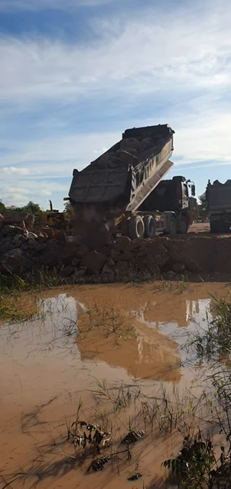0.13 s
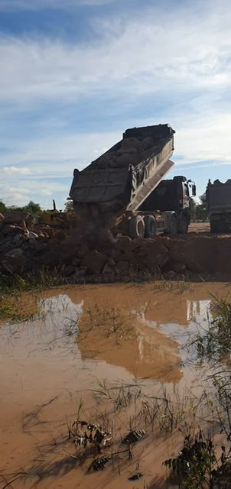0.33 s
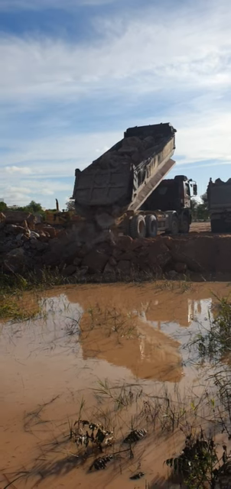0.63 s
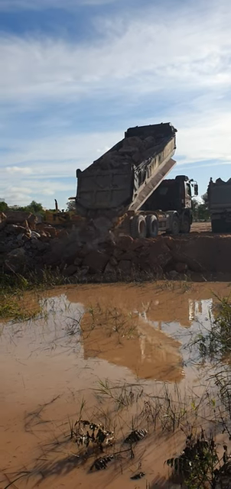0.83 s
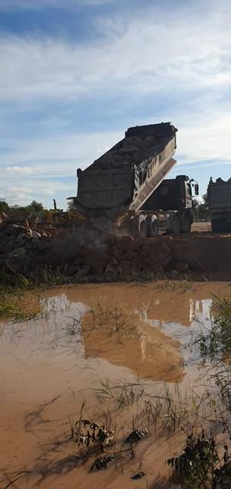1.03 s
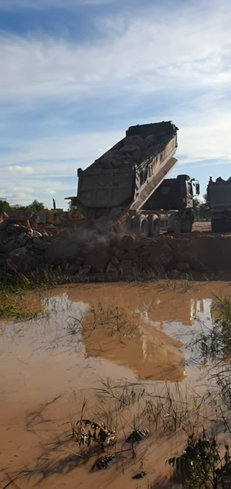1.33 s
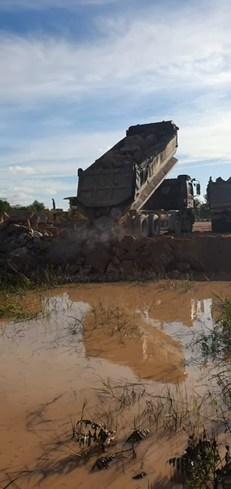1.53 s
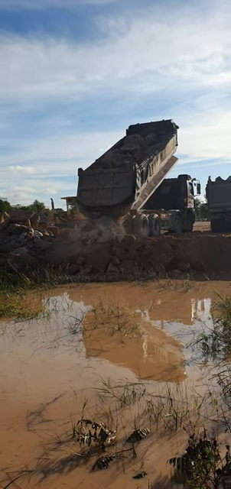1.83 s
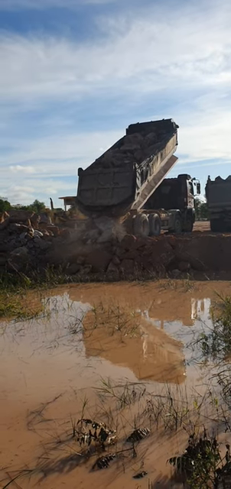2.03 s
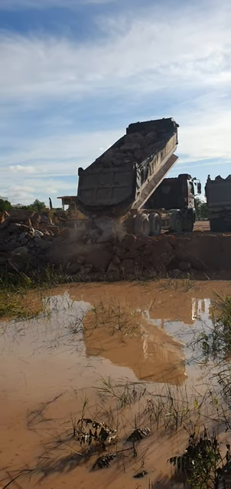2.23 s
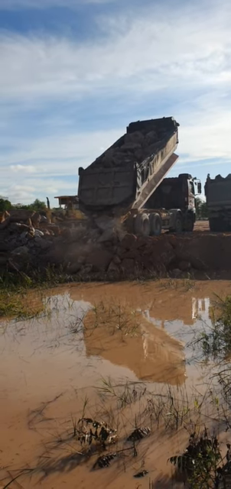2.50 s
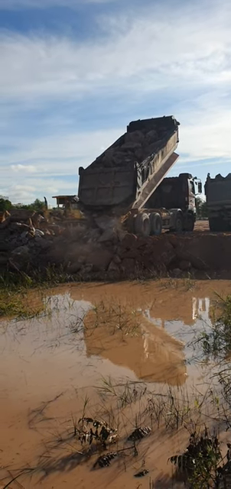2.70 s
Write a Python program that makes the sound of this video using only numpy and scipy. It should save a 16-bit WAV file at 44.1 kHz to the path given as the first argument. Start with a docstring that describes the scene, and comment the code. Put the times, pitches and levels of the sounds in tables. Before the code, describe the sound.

Rocks and soil tumble from a dump truck bed with booming thuds over a diesel drone

```python
"""A load of stone and soil rumbles and rattles from the raised steel bed of a dump truck across a pond.
The pour is shaped noise over a shower of small contacts; big rocks are contact bursts with short tones.
Decaying sines make ground booms and bed clangs, wavering tones make squeals, and filtered noise makes chips.
A diesel drones on lines tied to its firing rate, over a noise roar. The pour thins out.
A small stereo microphone hears it from afar."""
import sys
import numpy as np
from scipy import signal
from scipy.fft import rfft, irfft, next_fast_len
from scipy.io import wavfile
from scipy.ndimage import uniform_filter1d, minimum_filter1d, map_coordinates

SR = 44100
rng = np.random.default_rng(int(sys.argv[2]) if len(sys.argv) > 2 else 0)


def output_pcm(signal):
    """Save a mono or channel-first signal as 16-bit PCM at the path in sys.argv[1].

    Samples are clipped to [-1, 1] before scaling.
    """
    pcm = np.clip(np.atleast_2d(signal).T, -1, 1) * 32767
    wavfile.write(sys.argv[1], SR, np.round(pcm).astype(np.int16))


N = 126126


def amp(db):
    """Decibels to gain."""
    return 10 ** (np.asarray(db) / 20)


def unit(x):
    """Scale to rms 1."""
    return x / np.sqrt(np.mean(x ** 2) + 1e-20)


def along(points, hz):
    """Read (frequency, value) points on a log frequency axis."""
    f, v = np.transpose(points)
    return np.interp(np.log(hz + 1), np.log(f + 1), v)


def since(s):
    """Seconds since s, zero before it."""
    return np.maximum(np.arange(N) / SR - s, 0)


def curves(rows):
    """One value per sample for each column after the time."""
    s, *columns = np.transpose(rows)
    return [np.interp(since(0), s, column) for column in columns]


def wobble(rate):
    """A smooth random curve, rate knots a second."""
    knots = rng.standard_normal(8192)
    return map_coordinates(knots, [since(0) * rate], mode="wrap")


def wander(size, width_hz, smooth):
    """A randomly walking phase that blurs a tone, averaged over smooth samples."""
    drift = np.cumsum(rng.standard_normal(size)) * np.sqrt(2 * np.pi * abs(width_hz) / SR)
    return uniform_filter1d(drift, smooth)


def tone(hz, width_hz):
    """A sine of rms 1, blurred by a wandering phase."""
    return np.sqrt(2) * np.sin(2 * np.pi * hz * since(0) + wander(N, width_hz, SR // 700))


def blow(s, rise_s, t60):
    """A quick rise and an exponential decay of 60 dB in t60 seconds."""
    t = since(s)
    return (1 - np.exp(-t / rise_s)) * amp(-60 * t / t60)


def filtered(x, response):
    """Apply a complex response of frequency."""
    m = next_fast_len(N + SR // 2)
    return irfft(rfft(x, m) * response(np.fft.rfftfreq(m, 1 / SR)), m)[..., :N]


def band_noise(pitch_hz, octaves):
    """Stereo noise of rms 1 in a bell-shaped band around one pitch."""
    def bell(hz):
        return np.exp(-.5 * (np.log2((hz + 1) / pitch_hz) / octaves) ** 2)
    return unit(filtered(rng.standard_normal((2, N)), bell))


def coloured(x, spectrum):
    """A causal minimum-phase filter that keeps the power of white noise."""
    size = 8192
    hz = np.fft.rfftfreq(size, 1 / SR)
    cepstrum = irfft(np.log(np.maximum(amp(along(spectrum, hz)), 1e-6)))
    # folding the cepstrum forward in time makes the filter causal
    cepstrum[1:size // 2] *= 2
    cepstrum[size // 2 + 1:] = 0
    ring = irfft(np.exp(rfft(cepstrum)))
    return signal.fftconvolve(x, ring[None] / np.linalg.norm(ring), axes=1)[:, :N]


# how alike the two microphone ports sound: frequency_hz, likeness (0-1)
LIKENESS = [(80, .96), (300, .88), (600, .93), (1400, .72), (2100, .82), (3200, .5), (5000, .35),
            (12000, .2)]


def spread(pair):
    """Two unrelated signals to left and right: alike in the bass, less so in the treble."""
    def mid_and_side(hz):
        turn = np.arccos(np.clip(along(LIKENESS, hz), -1, 1)) / 2
        return np.array([np.cos(turn), np.sin(turn)])
    mid, side = filtered(pair, mid_and_side)
    return np.array([mid + side, mid - side])


def grit(clump_db, rate):
    """Stereo noise bunched into tiny contacts."""
    return unit(spread(rng.standard_normal((2, N)) * amp(clump_db * wobble(rate))))


def rubble(contacts_per_s):
    """Stereo train of separate contacts at random moments."""
    lands = rng.random((2, N)) < contacts_per_s / SR
    return unit(spread(lands * np.sign(rng.standard_normal((2, N)))))


# strength of the pour over time: time_s, rumble_db, rattle_db
POUR_LEVELS = [(.1, -23.5, -31), (.45, -21, -36), (.68, -29.5, -31), (.88, -30.5, -33.5),
               (1.03, -24.5, -34.5), (1.15, -29.5, -38.5), (1.58, -31, -49.5), (1.76, -27, -32),
               (1.88, -36.5, -38.5), (2.1, -32, -36), (2.5, -38.5, -40.5), (2.86, -33.5, -35.5)]
# tone of the falling soil: frequency_hz, relative_db
RUMBLE_TONE = [(30, -44.5), (50, 3), (110, 3.5), (220, 3.5), (320, -9.5), (600, -7.5), (1200, -56)]
# tone of the small stones: frequency_hz, relative_db
RATTLE_TONE = [(200, -33.5), (350, -9), (410, -18), (520, 4), (640, -2.5), (780, -4), (1000, -0.5),
               (1300, -2), (1700, -6.5), (2400, -9.5), (3000, -16), (4800, -20.5), (6000, -27.5),
               (7900, -41), (10500, -45.5), (12500, -31), (14000, -53), (15800, -60)]


def pour(stones_per_s=170, size_db=-0.5, stone_t60=0.067):
    """Soil rumbles while a stream of small stones of random size rattles down."""
    rumble_db, rattle_db = curves(POUR_LEVELS)
    lands = rng.random(N) < stones_per_s / SR
    sizes = lands * amp(size_db * np.minimum(rng.exponential(size=N), 3))
    # overlapping stones add in power
    power = signal.fftconvolve(sizes ** 2, blow(0, 0.00021, stone_t60) ** 2)[:N]
    contacts = np.sqrt(np.abs(power))
    rattle = unit(coloured(contacts * grit(clump_db=0.5, rate=660), RATTLE_TONE))
    rumble = unit(coloured(grit(clump_db=0.0, rate=43), RUMBLE_TONE))
    return amp(rattle_db) * rattle + amp(rumble_db) * rumble


# firing rate of the diesel, before a slight random waver: time_s, firing_hz
FIRING_RATE = [(2.55, 83.94), (2.61, 83.1), (2.82, 81.4)]
# level of the exhaust drone: time_s, level_db
DRONE_LEVEL = [(.1, -26.5), (.9, -22.5), (1.15, -21), (1.9, -20), (2.55, -20.5), (2.86, -27.5)]
# exhaust lines, the sixth multiple being the firing note: cycle_rate_multiple, relative_db
EXHAUST_LINES = [(3, -22), (5, -18.5), (6, -2), (7, -12), (8, -22.5), (12, -22), (15, -28), (18, -32)]
# tone of the engine roar: frequency_hz, relative_db
ROAR_TONE = [(25, -19.5), (45, 1), (65, 10), (105, 2), (138, -8.5), (215, -5.5), (280, -11), (400, -18),
             (530, -13.5), (640, -11), (770, -14), (1020, -11), (1400, -15), (1950, -12.5), (2400, -20.5),
             (3050, -29.5), (4100, -28.5), (4950, -23.5), (5900, -34), (7800, -54), (10500, -41.5),
             (12500, -49.5), (15800, -59)]
ROAR_DB, FIRING_DEPTH = -28, 0.024  # roar level; share of its swing at each firing
CYLINDERS = 6


def engine():
    """Exhaust lines on the firing rate, with a roar that throbs at each firing."""
    firing_hz, = curves(FIRING_RATE)
    level_db, = curves(DRONE_LEVEL)
    phase = 2 * np.pi * np.cumsum(firing_hz * (1 + 0.0053 * wobble(11.49))) / SR
    drone = np.zeros(N)
    for multiple, db in EXHAUST_LINES:
        line_phase = round(multiple) / CYLINDERS * phase + rng.uniform(0, 2 * np.pi)
        drone += amp(db + 0.91 * wobble(9.96)) * np.sin(line_phase)
    throb = 1 + FIRING_DEPTH * np.sin(phase)
    roar = coloured(grit(clump_db=0.66, rate=200) * throb, ROAR_TONE)
    return np.sqrt(2) * amp(level_db) * drone + amp(ROAR_DB) * unit(roar)


# rocks landing, levels before the gains set in rocks(): start_s, thud_db, knock_db, crack_db, pitch_hz
ROCK_HITS = [(0.103, -17, -41, -46, 1950), (0.127, -31, -21.5, -47, 1230), (.135, -16.5, -13, -29, 497),
             (.146, -11, -16.5, -51, 557), (0.191, -22, -26, -36, 626), (0.227, -38, -46, -44, 613.6),
             (0.256, -40, -30, -54, 1550), (.295, -27, -20, -33, 1024), (0.307, -14, -23, -38.5, 662),
             (.320, -25, -22, -40, 994), (0.352, -22, -30, -54, 1660), (.387, -23, -24.5, -33, 1754),
             (.412, -34, -21.5, -43, 1580), (0.423, -24, -21.5, -29.5, 1600),
             (0.436, -15.5, -28, -42, 1630), (0.458, -26, -36, -63, 510), (0.522, -17, -23, -49, 1560),
             (.552, -45, -24.5, -42, 1770), (0.586, -18, -21, -35.5, 657), (.660, -23, -31, -38, 593),
             (.735, -18.5, -38, -44, 1600), (0.754, -44, -24, -28, 1068), (0.79, -26, -24, -30.5, 1100),
             (0.812, -22, -40, -56, 1650), (.914, -32, -20.5, -30.5, 1493), (.921, -16, -18.5, -33, 686),
             (.934, -19.5, -21, -38, 1553), (0.955, -18, -21, -33.5, 2017), (.976, -30, -30.5, -53, 1510),
             (1.002, -26, -26, -39, 1735), (1.020, -16, -25.5, -38, 514), (1.426, -39, -28.5, -63, 533),
             (1.62, -22.5, -25.5, -55, 1159), (1.663, -18.5, -17.5, -24, 1640),
             (1.677, -25, -23.5, -35, 650), (1.692, -17.5, -26, -35, 1670), (1.702, -24, -20, -33, 374),
             (1.718, -39, -26, -30.5, 542), (1.736, -26, -30, -42, 290), (1.759, -20.5, -35, -44, 2040),
             (1.907, -17.5, -21.5, -45, 658.5), (1.921, -23, -32, -35.5, 443),
             (2.001, -30, -24.5, -42.5, 1720), (2.081, -27, -39, -41.5, 1020), (2.249, -32, -31, -48, 1854),
             (2.320, -33, -32, -66, 350)]


def rock_layer(levels_db, spectrum, gain_db, rise_s, t60, contacts_per_s):
    """Each rock sets off a dying burst of separate contacts in one register."""
    power = np.zeros(N)
    for rock, db in zip(ROCK_HITS, levels_db):
        power += (amp(db + gain_db) * blow(rock[0], rise_s, t60)) ** 2
    return coloured(np.sqrt(power) * rubble(contacts_per_s), spectrum)


# upper modes of a cracking stone: pitch_multiple, relative_db
CLINK_MODES = [(1.53, -2), (2.13, -3), (3.05, -7.5), (4.4, -2.5)]
CLINK_T60_S, CLINK_TOP_HZ = .05, 5200


def rock_tones(tock_db, tock_t60, tock_width_hz, push_db, push_hz, push_t60):
    """Each rock rings at its pitch, clinks in its upper modes and briefly pushes the soil."""
    out = np.zeros(N)
    t = np.arange(SR // 8) / SR
    for s, thud_db, knock_db, crack_db, hz in ROCK_HITS:
        tock_phase = 2 * np.pi * hz * t + wander(len(t), tock_width_hz, SR // 900)
        tock = amp(knock_db + tock_db - 60 * t / tock_t60) * np.sin(tock_phase)
        clink = np.zeros(len(t))
        for multiple, db in CLINK_MODES:
            if multiple * hz < CLINK_TOP_HZ:
                decay = amp(crack_db + db - 60 * t / CLINK_T60_S)
                clink += decay * np.sin(2 * np.pi * multiple * hz * t)
        soil_hz = push_hz * np.exp(0.21 * rng.normal())
        push = amp(thud_db + push_db - 60 * t / push_t60) * np.sin(2 * np.pi * soil_hz * t)
        onset = 1 - np.exp(-t / 0.00041)
        out[round(s * SR):][:len(t)] += np.sqrt(2) * (tock + clink + push) * onset
    return out


# tone of rock into soil: frequency_hz, relative_db
THUD_TONE = [(50, -16.5), (95, -4.5), (180, -1.5), (240, -4.5), (350, -11), (600, -25), (1500, -72)]
# tone of rock against rock: frequency_hz, relative_db
KNOCK_TONE = [(150, -22.5), (330, 3), (420, -1.5), (520, 9), (660, 4), (770, -3.5), (980, -1), (1250, -4),
              (1700, 0.5), (2100, -2), (2800, -13), (4500, -17.5), (9000, -84.5)]
# tone of cracking edges: frequency_hz, relative_db
CRACK_TONE = [(1000, -21), (2500, 6), (3300, 1), (4700, 7.5), (5400, 0), (6500, -10.5), (8200, -25),
              (10500, -18.5), (12500, -19), (15800, -41)]


def rocks():
    """A landing rock thuds into soil, knocks on its neighbours and cracks at the edges."""
    _, thud_db, knock_db, crack_db, _ = np.transpose(ROCK_HITS)
    tones = rock_tones(tock_db=3, tock_t60=0.039, tock_width_hz=68,
                       push_db=3, push_hz=168.4, push_t60=0.039)
    thuds = rock_layer(thud_db, THUD_TONE, gain_db=0.0, rise_s=0.0011, t60=0.12, contacts_per_s=900)
    knocks = rock_layer(knock_db, KNOCK_TONE, gain_db=0.0, rise_s=0.0008, t60=0.098, contacts_per_s=800)
    cracks = rock_layer(crack_db, CRACK_TONE, gain_db=3, rise_s=0.00029, t60=0.081, contacts_per_s=1200)
    return tones + thuds + knocks + cracks


# heavy masses hitting the ground: start_s, level_db, pitch_hz
GROUND_BOOMS = [(0.139, -14, 57), (0.186, -6, 94), (.81, -37, 48), (0.947, -10, 96.3), (1.02, -35, 49),
                (1.691, -8.5, 53.5), (1.767, -10, 104)]


def booms():
    """Heavy lumps shake the ground for a few cycles."""
    out = np.zeros(N)
    for s, db, hz in GROUND_BOOMS:
        shake = np.sqrt(2) * np.sin(2 * np.pi * hz * since(s))
        out += amp(db) * blow(s, rise_s=.006, t60=.15) * shake
    return out


# the steel bed struck: start_s, level_db, pitch_hz
BED_CLANGS = [(0.192, -16.5, 627), (0.919, -11.5, 657), (1.666, -21, 630), (1.664, -20, 2042),
              (1.667, -24, 1767)]
CLANG_T60_S, CLANG_WIDTH_HZ = 0.1, 12
# stones squealing on steel: start_s, length_s, pitch_hz, level_db, roughness (0-1)
STONE_SQUEALS = [(1.077, 0.035, 4190, -31, .8), (1.097, 0.06, 3797, -32.5, .65),
                 (1.12, 0.049, 4350, -36, 0.5), (1.173, 0.049, 4455, -36, .55),
                 (1.162, 0.092, 4050, -44.5, .9), (1.28, .06, 4950, -46.5, 0.67),
                 (2.592, 0.092, 1912, -33, .09), (2.61, .065, 4230, -46, 0.32),
                 (2.61, 0.23, 4960, -52, 0.15), (2.771, 0.078, 1974, -36, .2),
                 (2.836, 0.063, 5120, -42, .1)]
SQUEAL_WIDTH, SQUEAL_EDGE_S = 0.0437, 0.027  # blur as a share of pitch at full roughness; fade time
SCRAPE_DB, SCRAPE_OCTAVES = -0.5, 0.13  # rasp around each squeal, at full roughness


def steel_bed():
    """The loaded bed clangs briefly when struck; sliding stones squeal on it, some rasping, some clean."""
    out = np.zeros((2, N))
    for s, db, hz in BED_CLANGS:
        out += amp(db) * blow(s, 0.00064, CLANG_T60_S) * tone(hz, CLANG_WIDTH_HZ)
    for s, length, pitch_hz, db, rough in STONE_SQUEALS:
        # a slide shorter than two fades never reaches its full level
        slide = np.clip(np.minimum(since(s), length - since(s)) / SQUEAL_EDGE_S, 0, 1)
        squeal = tone(pitch_hz, rough * SQUEAL_WIDTH * pitch_hz)
        rasp = rough * amp(SCRAPE_DB) * band_noise(pitch_hz, SCRAPE_OCTAVES)
        out += amp(db + wobble(160)) * slide * (squeal + rasp)
    return out


# small chips snapping: start_s, level_db, pitch_hz
CHIP_SNAPS = [(0.295, -42, 10500), (.423, -40, 4700), (.661, -26.5, 4500), (0.686, -41, 10500),
              (0.753, -29, 4500), (.757, -40, 11000), (.790, -36, 4800), (.790, -42, 10900),
              (.914, -34, 11000), (.945, -38, 11500), (1.383, -26.5, 4360), (1.405, -45, 10900),
              (1.661, -44, 11000), (2.010, -46, 11000)]


def chips(t60=0.023, octaves=0.23):
    """Short bright snaps of splintering stone."""
    out = np.zeros((2, N))
    for s, db, pitch_hz in CHIP_SNAPS:
        out += amp(db) * blow(s, 0.00054, t60) * band_noise(pitch_hz, octaves)
    return out


# decay of the scattered tail: frequency_hz, t60_s
TAIL_T60 = [(100, 0.54), (1000, 0.15), (4000, 0.35), (12000, 0.023)]


def site(x):
    """Truck sides and earth banks scatter a short tail."""
    hz, t, z = signal.stft(rng.standard_normal((2, SR // 2)), SR, nperseg=256)
    decay = amp(-60 * t / along(TAIL_T60, hz)[:, None])
    tail = signal.istft(z * decay, SR, nperseg=256)[1]
    return spread(signal.fftconvolve(x, tail / np.linalg.norm(tail[0]), axes=1)[:, :N])


SITE_DB = -10  # gain of the scattered tail


def scene():
    """The falling load, its echo and the engine."""
    hits = rocks() + chips() + steel_bed() + booms()
    return hits + amp(SITE_DB) * site(hits) + pour() + engine()


# level difference of the microphone ports: frequency_hz, left_minus_right_db
LEFT_BALANCE = [(100, 0.5), (240, -2), (360, 3.5), (620, -4.5), (790, 3.5), (980, -7.5), (1150, 0),
                (1400, -8.5), (1850, -12), (2450, -9.5), (3150, -6.5), (4100, -15), (5100, -23.5),
                (7500, -17.5), (10000, -19.5), (12000, -8.5), (15500, -7)]
# phase difference of the microphone ports: frequency_hz, left_lead_rad
LEFT_LEAD = [(100, -.1), (350, -.1), (450, -.5), (750, -.4), (900, -.7), (1600, -.8), (2400, .4),
             (3500, 2.6), (4500, 4), (6200, 8.6), (12000, 15)]
START_S = .102  # the sound cuts in here
CLIP_DB = -.4  # ceiling for the peaks, ahead of the band limits
LOW_CUT_HZ, TOP_HZ = 36, 15850


def record(dry):
    """The left port is duller and shifted in phase; peaks are rounded and the band is limited."""
    def ports(hz):
        left = amp(along(LEFT_BALANCE, hz))
        shift = np.exp(1j * along(LEFT_LEAD, hz))
        return 2 / (1 + left) * np.array([left * shift, np.ones_like(hz)])

    def band_limits(hz):
        low_cut = (1j * hz) ** 2 / (LOW_CUT_HZ ** 2 - hz ** 2 + 1j * hz * LOW_CUT_HZ)
        return (hz < TOP_HZ) * low_cut

    cut_in = np.minimum(since(START_S) / 0.0019, 1)
    heard = filtered(dry, ports) * cut_in
    needed = np.minimum(1, amp(CLIP_DB) / (np.abs(heard).max(axis=0) + 1e-9))
    # hold the lowest gain around each peak, then smooth it
    gain = uniform_filter1d(minimum_filter1d(needed, SR // 200), SR // 200)
    fade_out = np.minimum(since(0)[::-1] / .002, 1)
    return filtered(heard * gain * fade_out, band_limits)


dry = scene()
out = record(dry)
output_pcm(out)
```